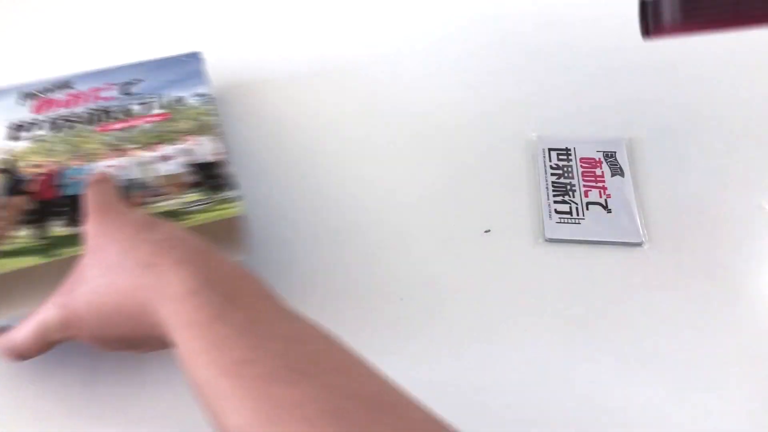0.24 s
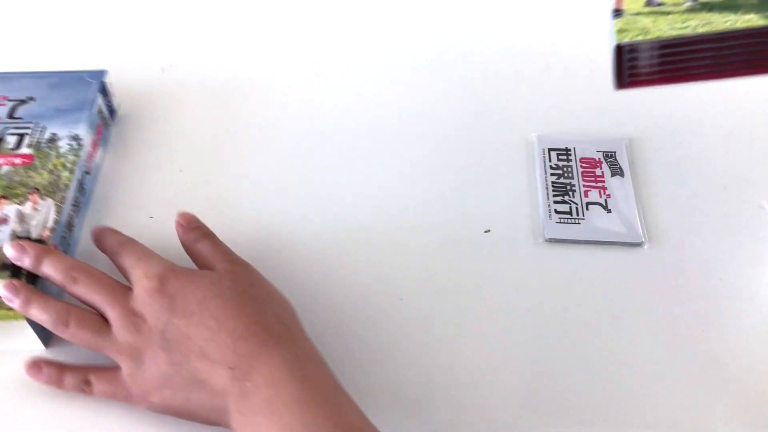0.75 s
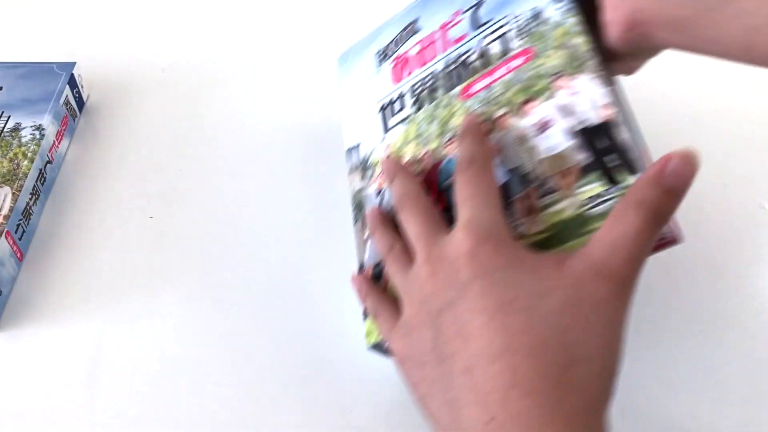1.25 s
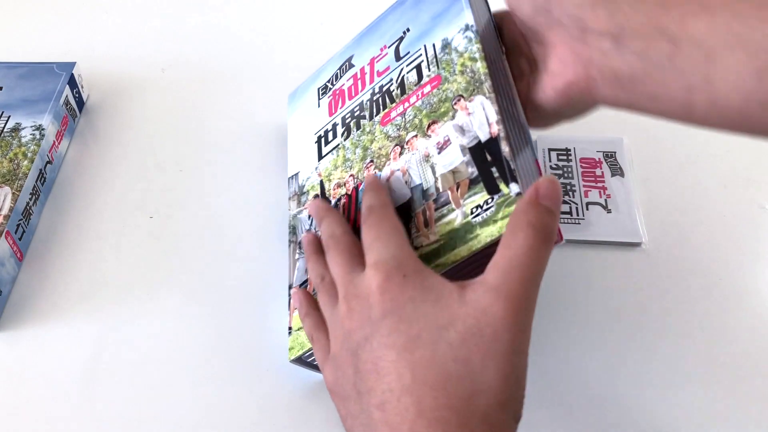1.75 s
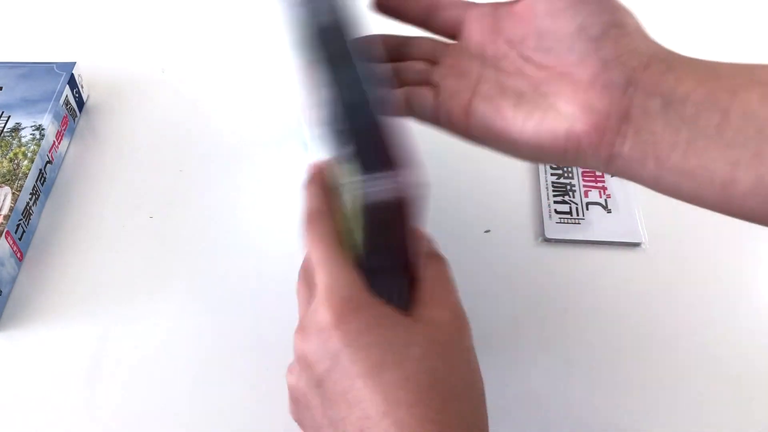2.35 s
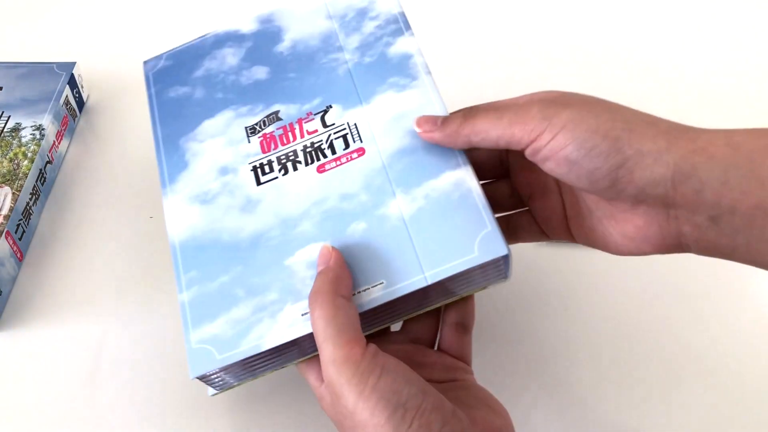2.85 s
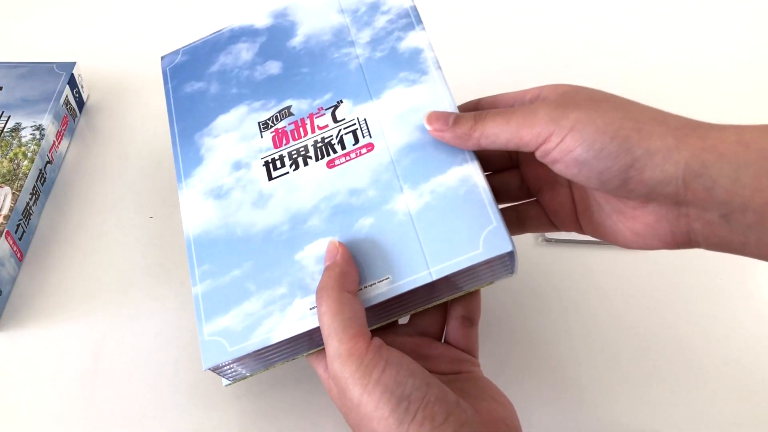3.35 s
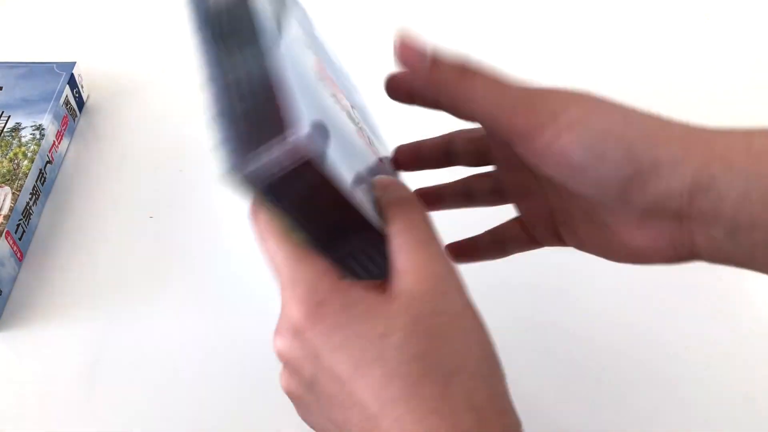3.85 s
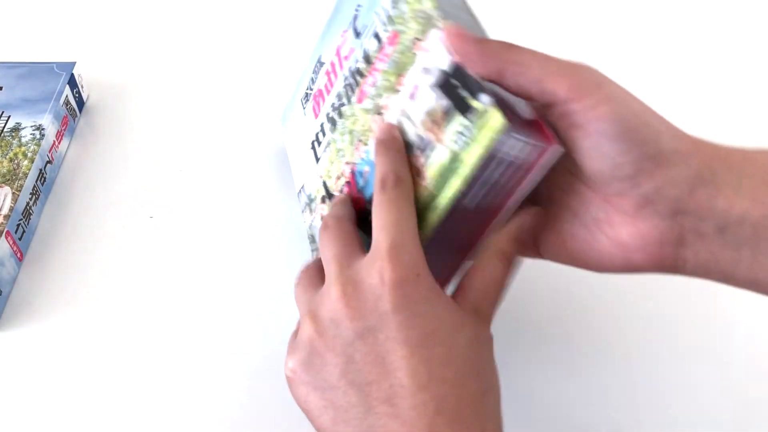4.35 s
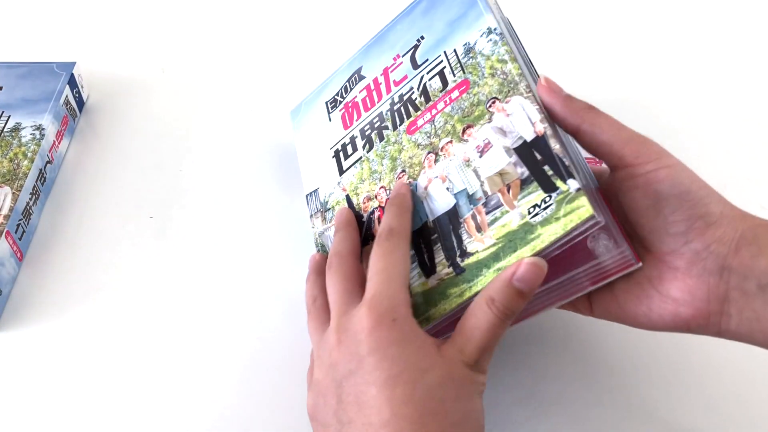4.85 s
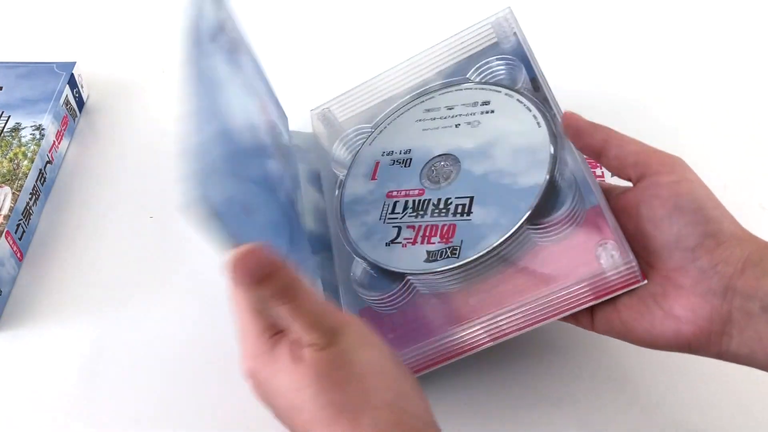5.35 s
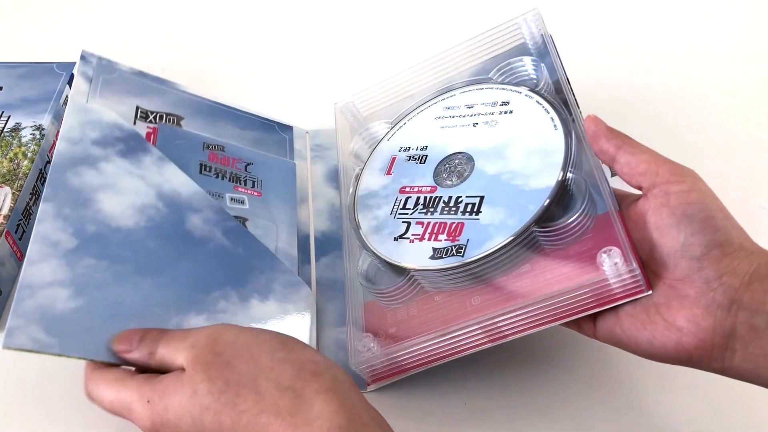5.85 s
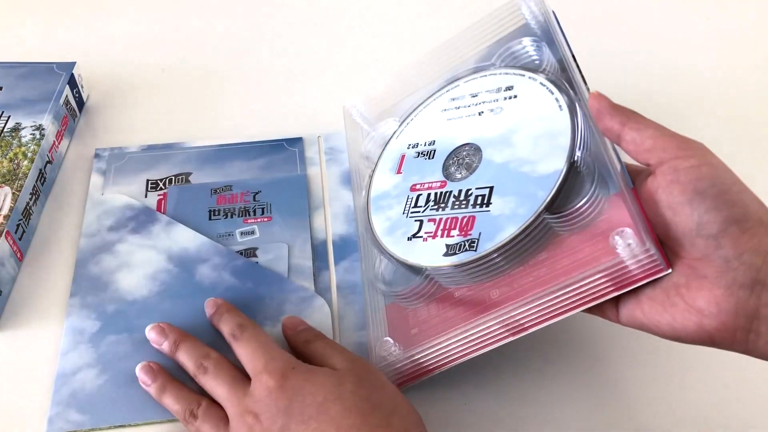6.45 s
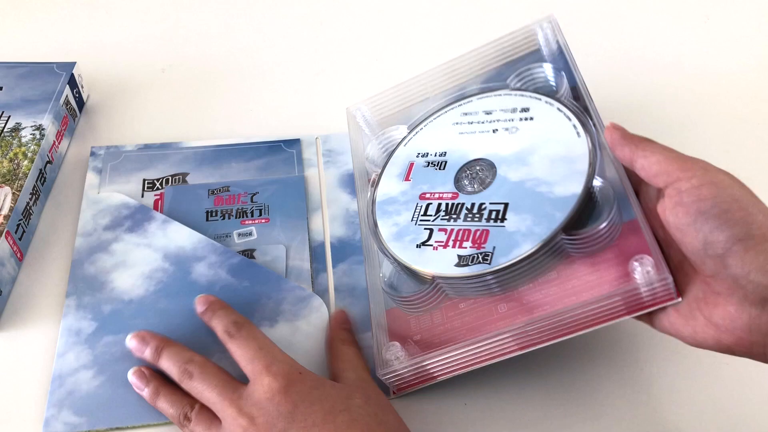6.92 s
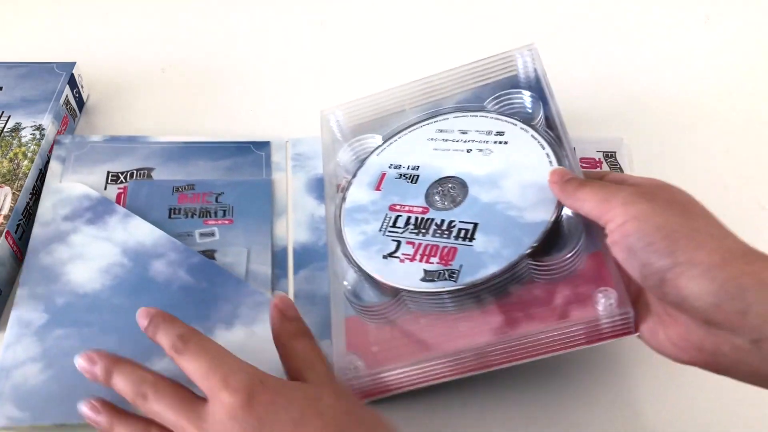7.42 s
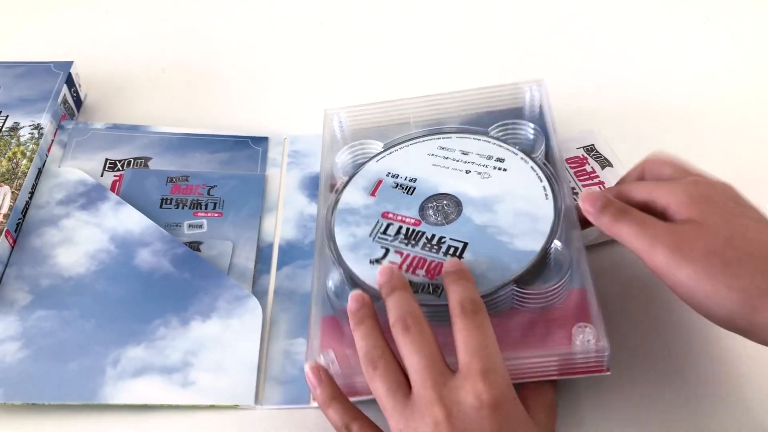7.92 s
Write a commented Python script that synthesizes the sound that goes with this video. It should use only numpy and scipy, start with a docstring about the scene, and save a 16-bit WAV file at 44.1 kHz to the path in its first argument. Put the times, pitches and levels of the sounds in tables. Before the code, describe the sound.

In the first second, hands knock a cardboard box aside on a table: a sharp crack near 0.3 seconds, a short scrape and a hollow knock near 0.6. A disc case of card and plastic is then handled, with a dull table thud near 1.5, a tap near 1.8 and light scuffs and bumps around 2.4. After a quieter stretch from about 2.8 to 4 seconds comes a cluster of clicks, with a sharp snap near 4.4 and a heavier thud near 4.6. A brief faint squeak follows near 4.9. The case unfolds with clicks and soft bumps from 5.3 to 5.8. From 6.2 on, fingers and card rustle and slide among light ticks and tiny squeaks, ending with firmer taps and a thud around 8 seconds. The small room adds slight reverberation, and a faint low hum and microphone hiss run throughout.

```python
"""Hands knock a cardboard box aside on a table, then turn, tap and unfold a disc case of card and plastic.
Each contact is a brief, rough force that cracks the edges and excites the modes of the box or the case;
heavier blows thud into the table top. Sliding fingers and card rasp, and stick-slip makes short squeaks.
A small room reverberates over a low hum and the hiss of one microphone."""
import sys
import numpy as np
from scipy import signal
from scipy.fft import rfft, irfft, next_fast_len
from scipy.io import wavfile
from scipy.ndimage import map_coordinates

SR = 44100
rng = np.random.default_rng(int(sys.argv[2]) if len(sys.argv) > 2 else 0)


def output_pcm(signal):
    """Save a mono or channel-first signal as 16-bit PCM at the path in sys.argv[1].

    Samples are clipped to [-1, 1] before scaling.
    """
    pcm = np.clip(np.atleast_2d(signal).T, -1, 1) * 32767
    wavfile.write(sys.argv[1], SR, np.round(pcm).astype(np.int16))


N = 360738

# modes of the cardboard box: (frequency [Hz], bandwidth [Hz], relative gain [dB])
BOX_MODES = [(430, 200, -5.5), (540, 47, 4), (720, 67, 1.5), (803, 76, 4.5), (912, 255, -1.5),
             (1616, 125, -5)]
# modes of the disc case: (frequency [Hz], bandwidth [Hz], relative gain [dB])
CASE_MODES = [(496, 57.5, 5.5), (700, 150, 2.5), (917, 306, 0), (1213, 227, 0), (1634, 140, -10)]
# modes of the broad faces of both: (frequency [Hz], bandwidth [Hz], relative gain [dB])
PANEL_MODES = [(248, 40.5, -1.5), (305, 92, -1), (389, 141, -4)]


def amp(db):
    """Amplitude ratio of a level in decibels."""
    return 10 ** (np.asarray(db) / 20)


def unit_rms(x):
    """Normalisation to an rms of 1."""
    return x / np.sqrt(np.mean(x ** 2) + 1e-20)


def log_interp(points, hz):
    """Interpolation of (frequency [Hz], value) points on a logarithmic frequency axis."""
    freqs, values = np.transpose(points)
    return np.interp(np.log(hz + 1), np.log(freqs + 1), values)


def wobble(knots_per_s):
    """Smooth random modulation: a spline through Gaussian knots."""
    knots = rng.standard_normal(int(N * knots_per_s / SR) + 4)
    return map_coordinates(knots, [np.arange(N) * knots_per_s / SR])


def filtered(x, response):
    """Linear filtering: the spectrum of x times a complex frequency response."""
    size = next_fast_len(N + SR // 2)
    return irfft(rfft(x, size) * response(np.fft.rfftfreq(size, 1 / SR)), size)[..., :N]


def coloured_noise(spectrum):
    """Spectral shaping of white noise, at an rms of 1."""
    return unit_rms(filtered(rng.standard_normal(N), lambda hz: amp(log_interp(spectrum, hz))))


def ring(force, modes):
    """Modal superposition: damped resonances of alternating sign that keep the power of white noise."""
    def response(f):
        total = 0
        for k, (hz, width, db) in enumerate(modes):
            damping = 1j * f * abs(width)
            total += (-1) ** k * amp(db) * damping / (hz * hz - f * f + damping + 1e-9)
        return total / np.sqrt(np.mean(np.abs(total) ** 2))
    return filtered(force, response)


def ring_body(force):
    """Forced vibration of the object in hand: first the box, then the case."""
    on_box = np.arange(N) < 1.0 * SR  # the hand leaves the box at 1 s
    return ring(force * on_box, BOX_MODES) + ring(force * ~on_box, CASE_MODES)


def contacts():
    """Impact excitation of edges and body; returns the direct sound and its average over all directions."""
    # taps, snaps and scuffs: (time [s], edge level [dB], rim re edge [dB], treble re edge [dB],
    # body re edge [dB], contact duration [ms])
    taps = [(.0821, -54.5, -1, -9, 7.5, 5.7), (.2305, -37.5, 0, -1.5, 10.5, 4),
            (.2648, -26.5, -3, -8, 3.5, 3.1), (.2794, -43, -1, -16, -7, 3.1),
            (.2937, -38.5, 0, -9, -11, 5.4), (.3566, -42, 0, -2, -17, 1.8),
            (.4973, -39.5, -3, -5.5, 10, 5.3), (.5164, -51.5, 5, -9, 11, 2.3),
            (.5664, -30.5, -3, -7.5, 12, 4.73), (.7713, -63.5, 1.5, -11, 11, 10.4),
            (.7851, -54, -10, -11, 7.5, 4.2), (1.264, -43.5, -4, -10.5, 7.5, 3.7),
            (1.447, -50, 1, -5.5, 8, 9.1), (1.7579, -34.5, -4.5, -18.5, 8, 3.4),
            (2.159, -60.5, -8, -23, 5.5, 5.2), (2.4004, -46, -2, -11, 4, 5.2),
            (2.4708, -58.5, -3, -7.5, 12.5, 13), (2.5252, -57.5, 2, -4, 4, 6),
            (2.6983, -62, -6.5, -20, 5, 8.9), (2.7576, -69, -7, -21, 14.5, 8.6),
            (3.5902, -56.5, -6, -11, -10, 3.8), (4.065, -59.5, -4, -13, 0, 11),
            (4.0971, -63, 1.5, -13, 4, 4.2), (4.1375, -41.5, -2, -9.5, 4.5, 3),
            (4.1744, -49.5, -3.5, -8, 5.5, 3.1), (4.2617, -54.5, -2.5, -5, 3, 3.2),
            (4.2827, -54, -1, -4, 6, 2.6), (4.3575, -30.5, 5, -2.5, -3.5, 3.36),
            (4.556, -38.5, -5.5, -11, 12, 5.2), (4.585, -41, -10.5, -14, -8, 5.5),
            (4.7237, -56.5, -7, -15, 9, 10), (4.9721, -55, -2, -7, 10.5, 1.8),
            (5.3424, -49.5, -0.5, -6, -1, 14), (5.3512, -38.5, -2, -11, -8, 3.2),
            (5.3644, -46.5, -13, -17, 9, 4.6), (5.6476, -69, -4.5, 0, 15, 12.5),
            (5.697, -61, -13, -11, 17.5, 5.7), (5.7889, -51, -12.5, -27, 8, 3.2),
            (6.38, -54.5, -1.5, -10.5, -10, 5), (6.393, -46.5, -3.5, -13, 3, 4.4),
            (6.4704, -53, -2.5, -3.5, 10, 3.8), (6.765, -60.5, -7, -11, 4.5, 5.3),
            (6.7845, -59.5, -1, -6.5, 6.5, 7.4), (7.0863, -54, -2, -6, 0, 5.3), (7.1155, -55.5, 3, 2, 4, 4),
            (7.2275, -57.5, 3, -6, 3, 4.3), (7.3756, -46.5, -2, -10, -1, 6),
            (7.5731, -39.5, -5, -13, -12, 3.9), (7.7099, -60.5, -7, -3, 11, 4),
            (7.804, -45, -3.5, -8, 4.5, 7.9), (7.9699, -34.5, -4.5, -13, 2, 6.05),
            (8.0326, -36, -1.5, -29, 1, 2.8), (8.1514, -56.5, -9, -14, 3, 6.6)]
    # modes of stiff edges, thin rims and the crack's treble:
    # (frequency [Hz], bandwidth [Hz], relative gain [dB])
    edge_modes = [(1432, 350, 6), (2250, 490, 5)]
    rim_modes = [(2980, 830, 3.5), (4520, 1600, -2)]
    snap_modes = [(6340, 2180, 5.5), (10260, 2500, 5), (14500, 8300, 1)]
    hard_soft_ms = [4.72, 7.3]  # shorter contacts are hard, longer ones soft
    t = np.arange(SR // 10) / SR
    impulse = t == 0  # a flat spectrum stands for the average over directions
    edge, rim, treble, body = np.zeros((4, 2, N + len(t)))
    for start, db, rim_db, treble_db, body_db, ms in taps:
        rise_share = np.interp(ms, hard_soft_ms, [.15, .6])
        grit_share = np.interp(ms, hard_soft_ms, [.45, .85])
        progress = t / (ms / 1000)
        grit = rng.standard_normal(len(t)) * (1 - np.exp(-progress / rise_share)) * np.exp(-1.6 * progress)
        grit /= np.linalg.norm(grit)
        strength = amp(db) * np.sqrt(ms * SR / 1000)
        force = strength * np.array([grit, impulse])
        blow = np.arange(len(t)) == np.argmax(progress > rise_share)  # net impulse on the heavy body
        push = strength * np.array([grit_share * grit + (1 - grit_share) * blow, impulse])
        span = slice(round(start * SR), round(start * SR) + len(t))
        edge[:, span] += force
        rim[:, span] += force * amp(rim_db)
        treble[:, span] += force * amp(treble_db)
        body[:, span] += push * amp(body_db)
    edge, rim, treble, body = (x[:, :N] for x in (edge, rim, treble, body))
    snap = ring(ring(treble, snap_modes), snap_modes)
    return ring(edge, edge_modes) + ring(rim, rim_modes) + snap + ring_body(body)


def thuds():
    """Compliant impact: flesh and card spread each blow in time, driving low modes of table and panels."""
    # blows into the table top: (time [s], level [dB], panel offset [dB])
    blows = [(0.231, -54, 18), (0.264, -41.5, 8.5), (0.495, -44, -1), (0.565, -39, -12), (0.787, -44, -21),
             (1.258, -46, -4.5), (1.455, -29.5, -10), (1.76, -35.5, 3), (1.812, -40.5, -1), (2.411, -52, 3),
             (2.467, -38, -3), (2.518, -54, 3), (3.551, -61, 3), (4.137, -39.5, 1), (4.158, -35.5, -9),
             (4.272, -41.5, -1.5), (4.566, -23.5, -28), (5.36, -48.5, -4.5), (5.659, -41, -4.5),
             (5.699, -44.5, -7), (5.788, -37.5, -4), (6.4, -50.5, -12), (6.471, -42.5, 3.5),
             (6.885, -52.5, 6.5), (7.204, -59, 8.5), (7.646, -50, -9), (7.81, -45, -10), (7.914, -33, -11),
             (7.974, -42.5, -11)]
    # modes of the table top: (frequency [Hz], bandwidth [Hz], relative gain [dB])
    table_modes = [(119.6, 14.5, 7), (158, 54, 0.5), (87, 14.3, 1.5)]
    softness_hz = 420
    table_force, panel_force = np.zeros((2, N))
    times, db, panel_db = np.transpose(blows)
    onsets = np.round(times * SR).astype(int)
    table_force[onsets] = amp(db + 25)
    panel_force[onsets] = amp(db + panel_db + 31) * rng.choice([-1, 1], len(times))
    vibration = ring(table_force, table_modes) + ring(panel_force, PANEL_MODES)
    return filtered(vibration, lambda f: (1 + 1j * f / softness_hz) ** -3)


def stroke_envelopes():
    """Incoherent addition: strokes add in power to a steady grip, giving gains of rasp, hiss and drag."""
    # fingers and card sliding: (time [s], hold [s], rasp level [dB], hiss level [dB], drag level [dB])
    strokes = [(0.26, 0.029, -59, -58, -45), (0.319, 0.044, -47.5, -50, -52),
               (0.518, 0.017, -57.5, -63, -51), (0.578, 0.057, -64, -72, -51), (.8, .14, -70, -75, -69.5),
               (1.477, 0.15, -68, -71, -68.5), (2.135, 0.21, -68.5, -71, -68.5),
               (2.379, 0.089, -62, -65.5, -59), (3.903, 0.2, -81, -71, -85), (4.09, 0.08, -63, -69, -60.5),
               (4.271, 0.021, -68, -73, -55), (4.364, 0.087, -60.5, -63.5, -79),
               (4.484, 0.026, -64, -72, -49), (4.562, 0.03, -55.5, -63, -47), (4.79, 0.2, -68, -75, -69),
               (5.405, 0.14, -66.5, -72, -73), (5.666, 0.034, -64, -67.5, -67),
               (5.954, 0.27, -75, -79, -83), (6.386, 0.044, -67, -66, -68.5),
               (6.847, 0.2, -64.5, -66.5, -66), (7.194, .02, -63, -73, -61), (7.243, 0.077, -60, -60, -70),
               (7.362, .17, -60.5, -64.5, -64), (7.907, 0.16, -66.5, -65.5, -64),
               (8.161, .03, -68, -64, -67)]
    grip_db = (-76, -77.5, -75)  # rasp, hiss and drag of hands that only hold
    attack_db_per_s, release_db_per_s = 378, 183
    t = np.arange(0, N + 64, 64) / SR
    power = amp(grip_db)[:, None] ** 2 * np.ones_like(t)
    for start, hold, *levels_db in strokes:
        ramps_db = np.maximum(attack_db_per_s * (start - t), release_db_per_s * (t - start - hold))
        power += amp(np.array(levels_db)[:, None] - np.maximum(0, ramps_db)) ** 2
    return [np.interp(np.arange(N) / SR, t, np.sqrt(p)) for p in power]


def rubbing():
    """Sliding friction: tiny slips modulate the noise of skin and card, and drag excites the body's modes."""
    # spectra of the rasp and of the fine hiss of skin: (frequency [Hz], relative density [dB])
    rasp_spectrum = [(700, -35), (1300, -3), (3000, -5), (5500, -8.5), (9000, -24.5)]
    skin_spectrum = [(3500, -34), (6000, -8.5), (16000, -12)]
    rasp_gain, hiss_gain, drag_gain = stroke_envelopes()
    slips = amp(1.4 * wobble(40) + 3.2 * wobble(400))
    rasp = unit_rms(slips * coloured_noise(rasp_spectrum)) * rasp_gain
    hiss = unit_rms(slips * coloured_noise(skin_spectrum)) * hiss_gain
    catches = amp(2.6 * wobble(60))
    drag = unit_rms(catches * rng.standard_normal(N)) * drag_gain
    return rasp + hiss + ring_body(drag) + amp(-2.5) * ring(drag, PANEL_MODES)


def squeaks():
    """Stick-slip oscillation at a nearly steady rate: a wavering tone with its octave."""
    # card slipping on plastic: (time [s], duration [s], frequency [Hz], level [dB])
    slips = [(4.271, 0.013, 2060, -52.5), (4.297, 0.009, 2250, -54), (4.317, 0.007, 2250, -67),
             (4.926, 0.055, 700, -50.5), (6.19, 0.014, 1114, -53.5), (7.455, 0.015, 3800, -56),
             (7.505, 0.012, 3810, -51)]
    out = np.zeros(N)
    waver = .045 * wobble(150)
    for start, duration, hz, db in slips:
        t = np.arange(round(duration * SR)) / SR
        span = slice(round(start * SR), round(start * SR) + len(t))
        phase = 2 * np.pi * np.cumsum(hz * (1 + waver[span])) / SR
        tone = np.sin(phase) + amp(-13) * np.sin(2 * phase)
        out[span] += amp(db) * np.sin(np.pi * t / duration) * tone
    return out


def reverberation(x):
    """Diffuse decay: each 0.3 s of sound meets a new noise tail, each frequency dying at its own rate."""
    # decay of the small room: (frequency [Hz], reverberation time T60 [s])
    decay_times = [(150, 0.28), (800, 0.17), (3000, 0.24), (12000, 0.13)]
    block, delay_samples = round(.3 * SR), 200
    out = np.zeros(N + SR)
    for start in range(0, N, block):
        hz, t, spectra = signal.stft(rng.standard_normal(SR // 2), SR, nperseg=256)
        decay = amp(-60 * t / log_interp(decay_times, hz)[:, None])
        tail = signal.istft(spectra * decay, SR, nperseg=256)[1]
        wet = signal.fftconvolve(x[start:start + block], tail / np.linalg.norm(tail))
        out[start + delay_samples:][:len(wet)] += wet
    return out[:N]


def noise_floor():
    """Broadband background noise: room hum and microphone hiss, wavering slightly in level."""
    # spectrum of hum and hiss: (frequency [Hz], relative density [dB])
    floor_spectrum = [(12, -68), (20, -40), (39, -26), (60, -12.5), (86, -14.5), (113, -4.5), (163, -3.5),
                      (193, -16.5), (234, -7), (277, -14.5), (367, -15), (459, -21.5), (607, -24),
                      (1480, -37.5), (16000, -41)]
    level_db = -60.5 + 0.26 * wobble(3.16)
    return amp(level_db) * coloured_noise(floor_spectrum)


def scene():
    """Superposition of direct sound, reverberation and background at one microphone."""
    direct, all_round = contacts()
    friction = rubbing() + squeaks()
    blows = thuds()
    wet = amp(-10) * reverberation(all_round + friction + amp(3.5) * blows)
    low_cut_hz = 70  # the microphone loses the deepest bass
    handling = filtered(direct + friction + blows + wet, lambda f: (1j * f / (low_cut_hz + 1j * f)) ** 2)
    return (handling + noise_floor())[None]


def record(dry):
    """Band limiting: the highest treble steps down by 24 dB, and nothing passes above the cutoff."""
    passband_hz, cutoff_hz = 15800, 16600
    return filtered(dry, lambda hz: np.where(hz < passband_hz, 1, amp(-24)) * (hz < cutoff_hz))


dry = scene()
out = record(dry)
output_pcm(out)
```